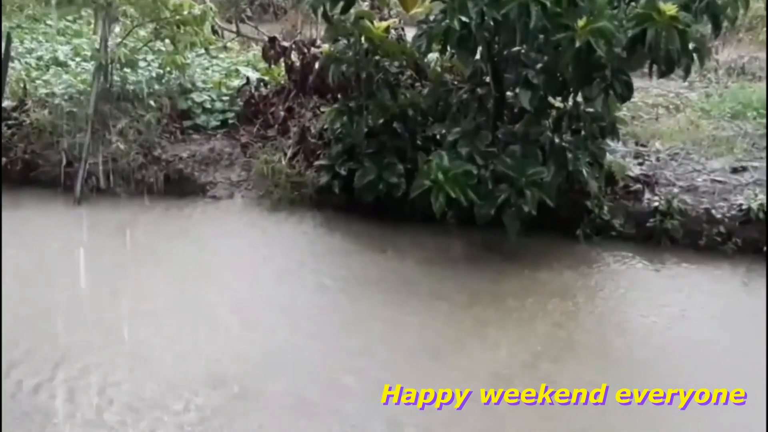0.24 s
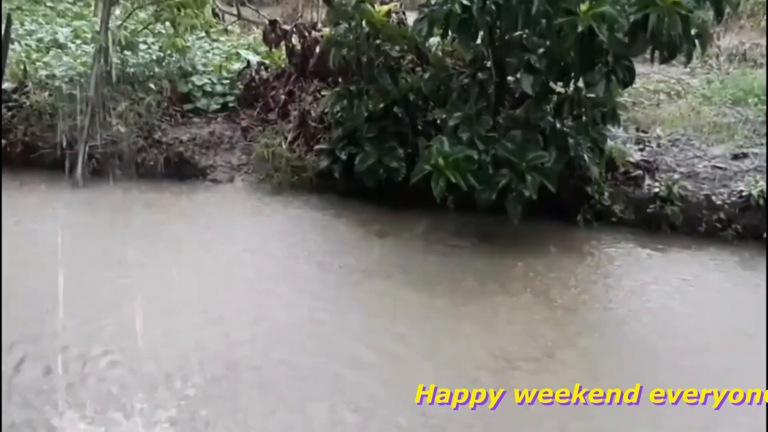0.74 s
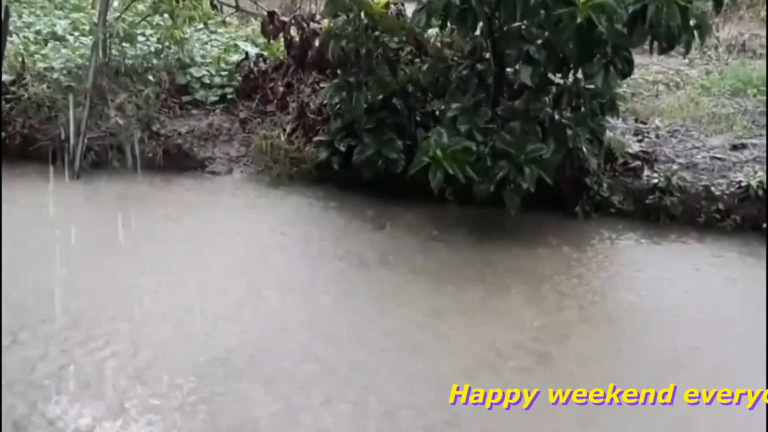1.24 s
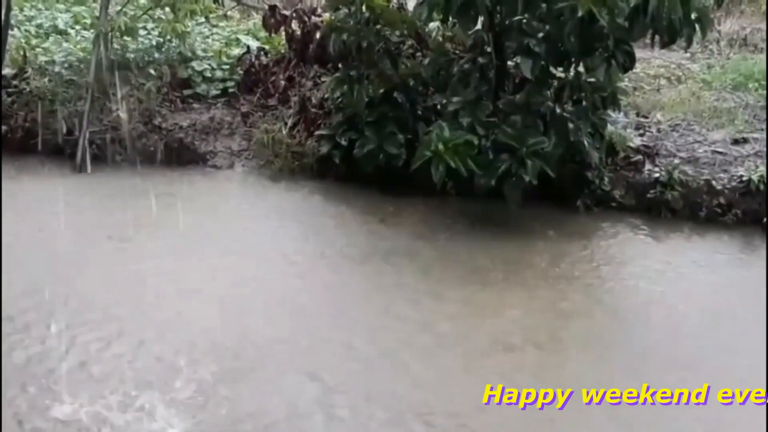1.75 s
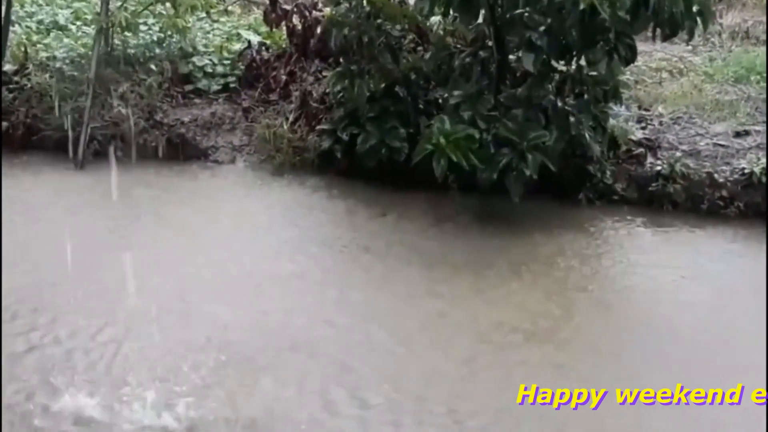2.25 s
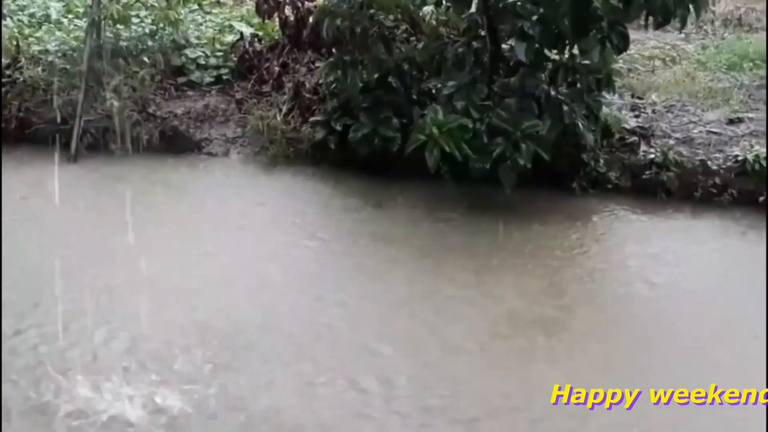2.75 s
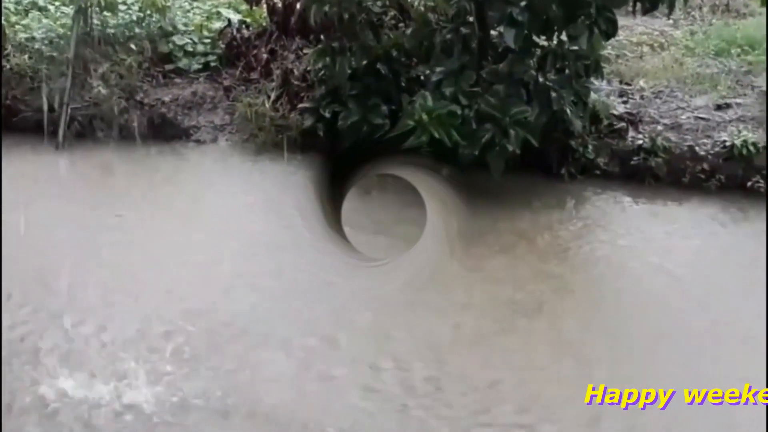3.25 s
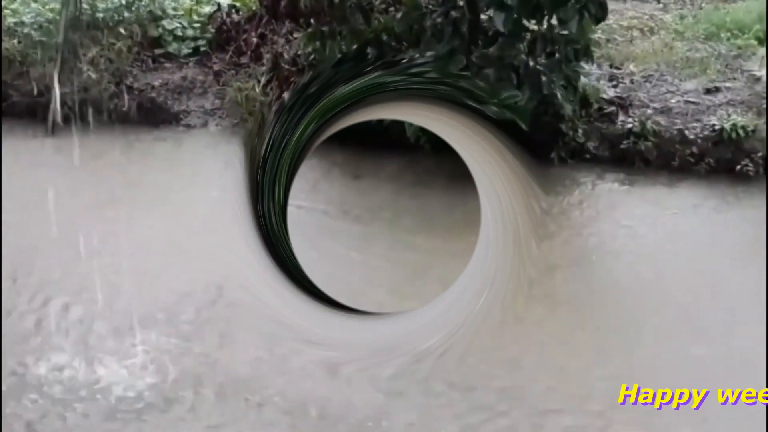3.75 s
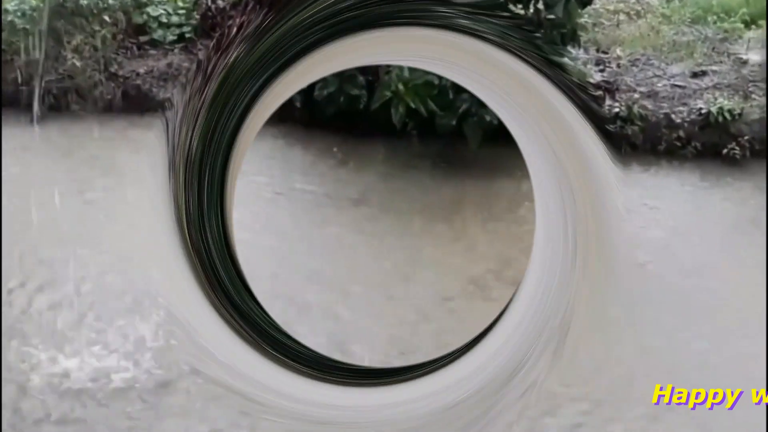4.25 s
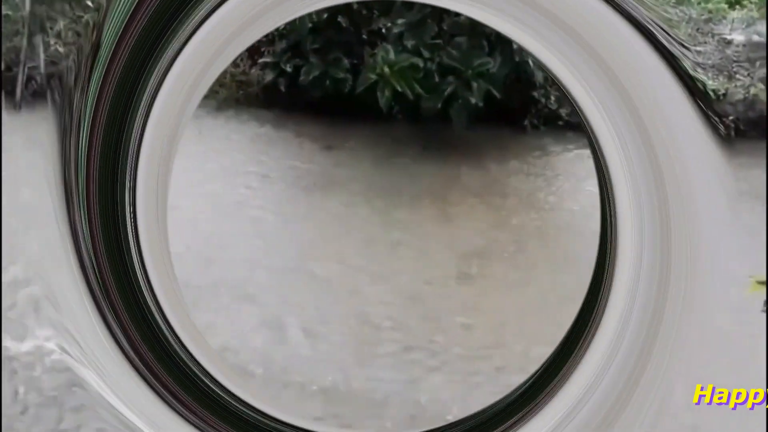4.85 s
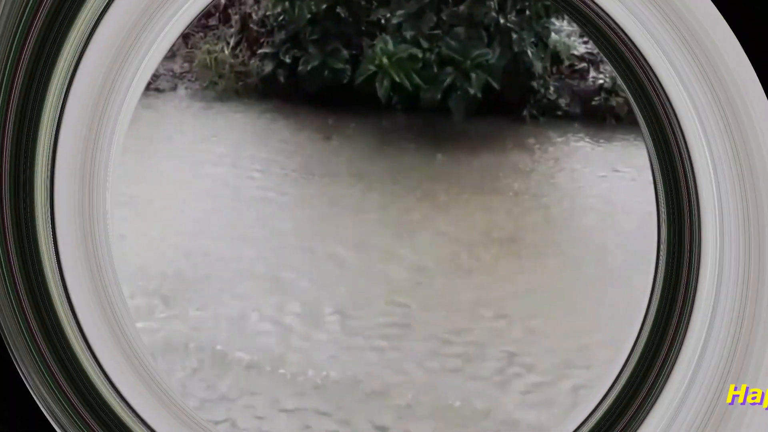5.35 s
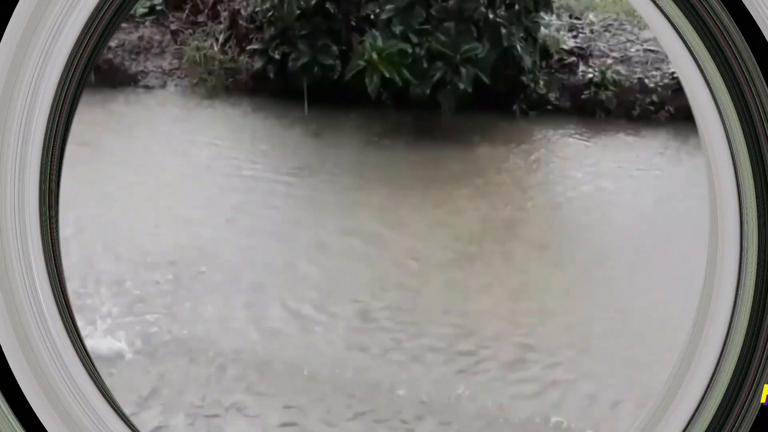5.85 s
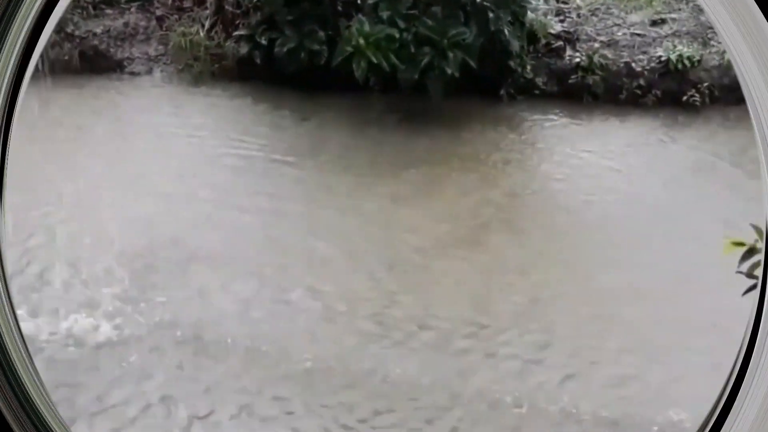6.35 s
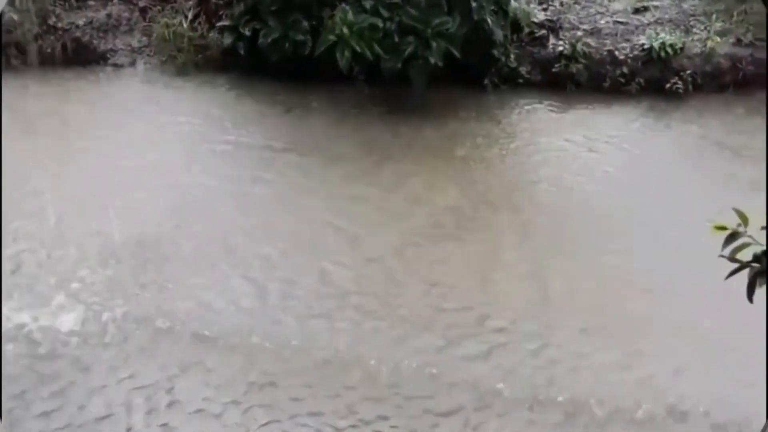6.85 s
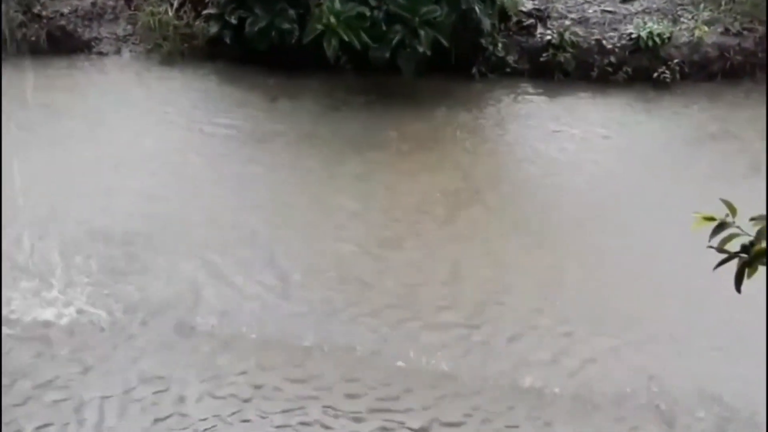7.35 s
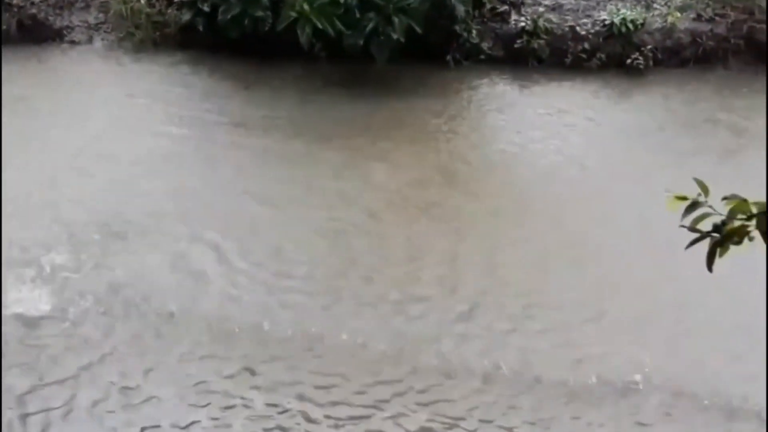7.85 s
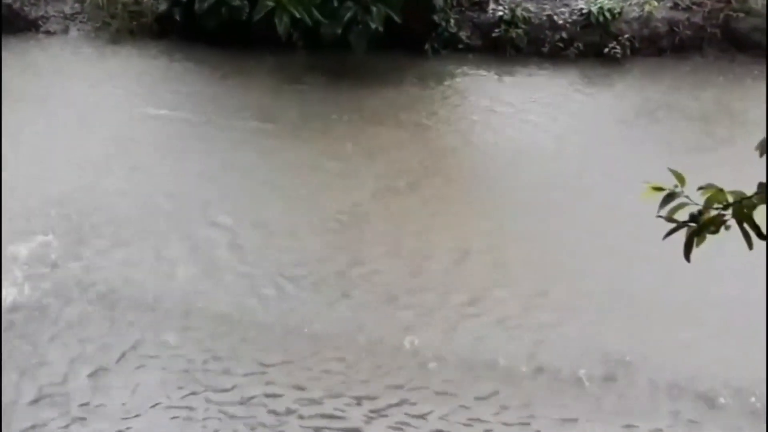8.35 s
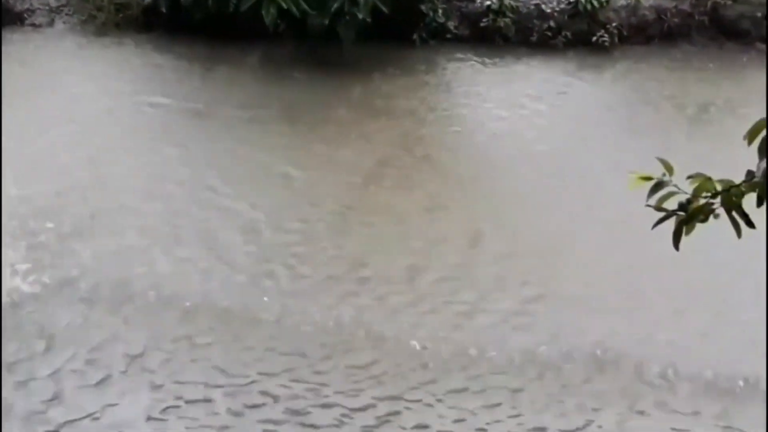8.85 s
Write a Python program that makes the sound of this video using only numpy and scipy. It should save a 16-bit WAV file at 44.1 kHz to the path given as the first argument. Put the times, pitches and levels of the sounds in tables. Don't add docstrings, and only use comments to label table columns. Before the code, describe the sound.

Heavy rain pours without a break onto a garden pond, captured close from the bank in wide stereo. Low gurgling run-off plunges into water, mid-pitched drops patter on leaves, and a bright, grainy fizz covers the surface. The level stays nearly even, fluttering with small gushes several times a second. Near drops crack sharply, often in the first 3 seconds, the strongest at about 1.7, leaning left. Brief bubble tones bloop low around 1.3 and 3.8, with a cluster of higher plinks near 4. A barely audible engine hums far away, dips around 4, returns weakly near 5.3, slows and is almost gone by 9. Between 3 and 8 the hiss turns slightly hollow, with a faint drone, most marked around 5.5, then clears. Near drops thin out mid-way and return from 6.7, and rain continues to the end.

```python
import sys
import numpy as np
from scipy import signal
from scipy.fft import rfft, irfft, next_fast_len
from scipy.io import wavfile
from scipy.ndimage import uniform_filter1d, minimum_filter1d, map_coordinates

SR = 44100
rng = np.random.default_rng(int(sys.argv[2]) if len(sys.argv) > 2 else 0)


def transcribe(signal):
    frames = np.atleast_2d(signal).T
    limited = np.clip(frames, -1, 1)
    pcm = np.round(limited * 32767).astype(np.int16)
    wavfile.write(sys.argv[1], SR, pcm)


def boost_factor(decibels):
    exponent = np.asarray(decibels, float) / 20
    return 10 ** exponent


N = 401751


def unit(x):
    return x / np.sqrt(np.mean(x ** 2) + 1e-20)


def along(points, hz):
    f, v = np.transpose(points)
    return np.interp(np.log(hz + 1), np.log(f + 1), v)


def curves(rows):
    s, *columns = np.transpose(rows)
    return [np.interp(np.arange(N) / SR, s, column) for column in columns]


def wobble(rate):
    knots = rng.standard_normal(int(N * rate / SR) + 4)
    return map_coordinates(knots, [np.arange(N) * rate / SR])


def filtered(x, response):
    m = next_fast_len(N + 8192)
    return irfft(rfft(x, m) * response(np.fft.rfftfreq(m, 1 / SR)), m)[..., :N]


# frequency in Hz, left-right correlation.
PORT_LIKENESS = [(40, 0.82), (250, 0.97), (600, 0.68), (950, 0.37), (1300, -0.45), (1750, -0.31),
                 (2300, 0.34), (2500, 0.24), (2900, -0.38), (3400, -0.1), (6200, -0.043), (7400, 0.21),
                 (9000, 0.024)]


def heard(pair, spectrum):
    def response(hz):
        turn = np.arccos(np.clip(along(PORT_LIKENESS, hz), -1, 1)) / 2
        return boost_factor(along(spectrum, hz)) * np.array([np.cos(turn), np.sin(turn)])
    mid, side = filtered(pair, response)
    return unit(np.array([mid + side, mid - side]))


def rings(s, hz, t60, gain, rise, size):
    t = np.arange(size) / SR
    age = t / t60[:, None]
    tone = np.sin(2 * np.pi * hz[:, None] * t * (1 + rise * age))
    wave = tone * boost_factor(-60 * age) * (1 - np.exp(-12 * age))
    at = np.round(s * SR).astype(int)[:, None] + np.arange(size)
    return np.bincount(at.ravel(), (gain[:, None] * wave).ravel(), N + size)[:N]


def drops(count, low_hz, high_hz, cycles, spread_db, rise, size):
    def shower():
        when, pitch, big = rng.random((count, 3)).T
        hz = low_hz * (high_hz / low_hz) ** pitch
        size_db = np.minimum(-spread_db * np.log(big), 6)
        return rings(when * (N - 1) / SR, hz, cycles / hz, hz * boost_factor(size_db), rise, size)
    return unit(np.array([shower(), shower()]))


def patchy(broad_db, fine_db):
    def patches(bins, frames):
        noise = rng.standard_normal(z.shape[1:])
        return unit(uniform_filter1d(uniform_filter1d(noise, size=bins, axis=0), size=frames, axis=1))
    z = signal.stft(rng.standard_normal((2, N)), nperseg=1024)[2]
    strength_db = broad_db * patches(14, 5) + fine_db * patches(3, 3)
    return unit(signal.istft(z * boost_factor(strength_db), nperseg=1024)[1][:, :N])


# time in seconds, level in dB over the mean.
DOWNPOUR = [(0, 1), (.6, 0.35), (.87, -0.3), (1.3, 0.3), (1.45, -.5), (2.05, -0.5), (2.6, 0.7),
            (3.95, -0.5), (4.15, -0.2), (4.45, -0.4), (4.75, 0.5), (5.5, .5), (5.6, -.5), (6.3, 0.44),
            (7.05, -0.36), (7.6, 0), (8.25, -1), (9.11, -0.1)]


def rain():
    pour_db, = curves(DOWNPOUR)
    deep_db, middle_db, fine_db = gushes()
    surge = wobble(24)
    return plunge(pour_db, deep_db, surge) + patter(pour_db, middle_db, surge) + fizz(pour_db, fine_db, surge)


# time in seconds, swell in dB, length in seconds,
# brightness from -1 (deep plunge) to 1 (fine spray).
GUSHES = [(.13, 0.98, 0.055, 0.091), (.35, 2, 0.045, -0.68), (.57, 1.2, 0.055, 0.3),
          (.76, 0.98, 0.048, 0.051), (1.04, 2.1, 0.086, 0.076), (1.23, 1.1, .08, -0.89),
          (1.71, 0.77, 0.064, -0.052), (1.92, 1.5, 0.063, 0), (2.16, 1.5, 0.055, -0.18),
          (2.71, 0.45, .09, .3), (2.99, 0.6, 0.029, 0.97), (3.15, 0.82, 0.064, 0.044),
          (3.36, 1.2, 0.047, .1), (3.78, 1, 0.11, 0.75), (3.99, 0.77, .07, 0.4), (4.84, 0.95, 0.06, 0),
          (5.23, .9, 0.056, -0.64), (5.45, 1.1, .08, .2), (5.83, 0.78, .07, -0.076), (6.04, 0.5, .07, 0.21),
          (6.29, .9, .08, -0.3), (6.76, 1.1, 0.056, 0.67), (7.26, 0.82, 0.13, -0.26), (7.63, .8, .07, 0.71),
          (7.75, 0.73, .06, -.8), (7.99, 0.9, .08, -0.68), (8.4, 1.2, 0.15, 0.00069), (8.77, 0.65, .08, .2),
          (9.02, 1.5, 0.046, 0.28)]


def gushes():
    t, swell_db = np.arange(N) / SR, np.zeros((3, N))
    for s, db, length, bright in GUSHES:
        span = slice(max(0, round((s - 3 * length) * SR)), round((s + 3 * length) * SR))
        shape = np.exp(-((t[span] - s) / length) ** 2)
        swell_db[:, span] += db * shape * np.array([[1 - bright], [1], [1 + bright]])
    return swell_db


# frequency in Hz, level in dB per Hz.
PLUNGE_COLOUR = [(60, -38), (110, -20.5), (150, -11.5), (280, -1), (360, -1), (430, 3.5), (520, 0),
                 (900, -1), (1200, -16), (2000, -45)]


def plunge(pour_db, gush_db, surge):
    drained_db = 0.05 * (np.arange(N) - N / 2) / SR
    level_db = -20.5 + 1.07 * pour_db + gush_db - drained_db
    plops = drops(count=500, low_hz=200, high_hz=1100, cycles=35, spread_db=3, rise=.1, size=2200)
    gurgle = patchy(broad_db=.6, fine_db=.7) + boost_factor(-19) * plops
    return boost_factor(level_db + 0.13 * surge + 0.09 * wobble(9.7)) * heard(gurgle, PLUNGE_COLOUR)


# frequency in Hz, level in dB per Hz.
PATTER_COLOUR = [(500, -56), (900, -7), (1120, -2), (1260, 1.5), (1850, -0.5), (2100, -2.5), (2800, -6),
                 (3300, -15), (5000, -42)]


def patter(pour_db, gush_db, surge):
    level_db = -15.5 + pour_db + 0.63 * gush_db
    plinks = drops(count=1200, low_hz=900, high_hz=3300, cycles=70, spread_db=3, rise=.05, size=1500)
    leaves = patchy(broad_db=0.78, fine_db=0.26) + boost_factor(-14.5) * plinks
    return boost_factor(level_db + 0.18 * surge + 0.54 * wobble(20)) * heard(leaves, PATTER_COLOUR)


# frequency in Hz, level in dB per Hz.
FIZZ_COLOUR = [(1800, -21.5), (3000, -0.5), (3500, -1), (4200, 0), (5000, -2.5), (6200, -3.5), (7000, -2.5),
               (7500, -1.5), (7800, -4), (8500, -11.5), (9200, -14.5), (10300, -15.5), (10800, -23)]


def fizz(pour_db, gush_db, surge):
    level_db = -18.5 + 1.1 * pour_db + 0.75 * gush_db + np.array([[-.25], [.25]])
    specks = drops(count=2400, low_hz=2800, high_hz=10500, cycles=90, spread_db=3, rise=.03, size=700)
    spray = patchy(broad_db=1.2, fine_db=1.46) + boost_factor(-12) * specks
    return boost_factor(level_db + 0.31 * surge + 0.55 * wobble(30)) * heard(spray, FIZZ_COLOUR)


# time in seconds, peak in dB, pitch in Hz, length in
# seconds.
SOFT_TONES = [(0.056, -22, 2370, .04), (0.42, -19, 2280, 0.04), (0.589, -17, 944, 0.045),
              (0.848, -16, 1780, .04), (1.06, -20, 1840, .03), (1.228, -16, 2404, 0.041),
              (1.238, -15.5, 444, 0.11), (1.353, -15, 427, 0.11), (1.465, -17.5, 418, 0.029),
              (2.626, -25, 2200, 0.056), (2.708, -20, 1360, 0.051), (2.704, -19, 7300, 0.059),
              (2.843, -29, 7500, .08), (3.18, -18, 2270, 0.056), (3.799, -20, 425.5, 0.14),
              (3.932, -14, 2340, 0.038), (3.915, -16, 1930, .04), (3.951, -14.5, 1990, .06),
              (3.985, -16, 2050, .04), (4.016, -16, 1600, 0.046), (4.03, -12.5, 2017, .03),
              (4.147, -17, 2267, 0.036), (5.559, -14, 1608, 0.03), (7.74, -18, 474, 0.082),
              (7.975, -20, 564, 0.076), (8.13, -19, 1690, 0.033), (8.84, -17, 1270, 0.035)]


def soft_tones():
    out, t, drift = np.zeros((2, N)), np.arange(N) / SR, wobble(60)
    for s, db, hz, length in SOFT_TONES:
        span = slice(max(0, round((s - length) * SR)), round((s + length) * SR))
        since = t[span] - s
        age = since / length
        waver = 1.9 * np.roll(drift, round(hz * 10))[span] + rng.uniform(0, 1.35, (2, 1))
        tone = np.sin(2 * np.pi * hz * since * (1 + 0.0071 * age) + waver)
        out[:, span] += boost_factor(db - 3.5 - 31 * age ** 2) * tone
    return out


# start in seconds, peak in dB, left-right difference in dB.
NEAR_DROPS = [(0.1121, -8, -0.5), (0.3321, -10, 0.0), (0.4943, -8, 0.0), (0.5496, -7, -0.5),
              (0.6764, -7, -1.0), (1.0146, -9, -1.0), (1.2151, -9, -1.0), (1.6945, -11, -0.5),
              (1.7195, 2, 3), (2.1485, -7, -1.0), (2.3077, -9, 0.5), (2.4864, -8, -1.0),
              (2.6668, -10, -0.5), (2.9756, -9, -1.0), (2.9961, -6, 0.0), (4.6493, -11, -1.0),
              (5.8722, -11, 0.0), (6.0626, -12, -1.5), (6.6692, -6, -1.5), (6.758, -6, -1),
              (6.776, -6, -0.5), (7.3985, -6, -1.0), (7.7712, -11, -1.0), (8.1514, -9, -1.0),
              (8.2955, -10, -0.5), (8.4871, -10, -0.5), (8.5599, -10, -0.5), (8.8453, -11, -0.5),
              (8.9979, -9, -0.5), (9.0623, -6, -0.5)]


def splats():
    out, t = np.zeros((2, N + SR)), np.arange(900) / SR
    for s, db, pan_db in NEAR_DROPS:
        crack = boost_factor(db - 5.5 - 60 * t / 0.025) * rng.standard_normal((2, len(t)))
        out[:, round(s * SR):][:, :len(t)] += crack * boost_factor([[pan_db / 2], [-pan_db / 2]])
    return filtered(out[:, :N], lambda hz: boost_factor(along(FIZZ_COLOUR, hz)))


# time in seconds, firing rate in Hz, level in dB.
ENGINE_RUN = [
    (0, 22.5, -41),
    (2, 22.1, -41.5),
    (2.9, 21.9, -42.5),
    (3.8, 22.2, -47),
    (5.3, 21.5, -41.5),
    (6.3, 21.3, -42.5),
    (7.8, 20.6, -50),
    (9.11, 20.3, -58),
]
# multiple of the firing rate, level in dB.
ENGINE_ORDERS = [(4, -15), (5, -3), (6, 0), (8, -14)]
# frequency in Hz, level in dB per Hz.
RUMBLE_COLOUR = [(20, -18), (70, -18), (110, 5.5), (160, -3), (260, -19)]


def engine():
    hz, tone_db = curves(ENGINE_RUN)
    load_off_s, ramp_s = 3.9, .3
    idle = np.clip((np.arange(N) / SR - load_off_s) / ramp_s + .5, 0, 1)
    load_db = -16 * idle
    rumble_db = -41.5 - 10 * idle
    turn = 2 * np.pi * np.cumsum(hz) / SR
    tones = np.zeros(N)
    for k, db in ENGINE_ORDERS:
        level_db = tone_db + db + (k < 6) * load_db + 1.5 * wobble(4)
        tones += boost_factor(level_db) * np.sin(k * turn + .3 * wobble(6))
    return tones + boost_factor(rumble_db) * heard(rng.standard_normal((2, N)), RUMBLE_COLOUR)


def scene():
    return rain() + soft_tones() + splats() + engine()


def limiter(x):
    need = np.minimum(1, .97 / (np.abs(x).max(axis=0) + 1e-9))
    return x * uniform_filter1d(minimum_filter1d(need, size=129), size=65)


def ragged_band_limit(x):
    hz, t, z = signal.stft(x, SR, nperseg=2048)
    dips = np.repeat(rng.exponential(size=len(t)), 2)[:len(t)]
    edge_hz = 10920 - 140 * dips
    return signal.istft(z * (hz[:, None] < edge_hz), SR, nperseg=2048)[1][:, :N]


def dissolve(x):
    start_s, end_s, late = 3.0, 8.0, 318
    share = np.clip((np.arange(N) / SR - start_s) / (end_s - start_s), 0, 1)
    return (1 - share) * x + share * np.pad(x, ((0, 0), (late, 0)))[:, :N]


# time in seconds, peak in dB.
HIGH_TICKS = [(0.0408, -58), (0.3321, -53), (0.609, -46), (0.7163, -50), (0.7816, -41), (1.1503, -50),
              (1.3613, -54), (2.6828, -54), (3.3792, -48), (3.7738, -55), (4.0292, -62), (5.5433, -47),
              (6.3081, -58), (7.7164, -45)]


def high_ticks():
    ticks = np.zeros((2, N))
    for s, db in HIGH_TICKS:
        burst = np.hanning(1100) ** 2 * rng.standard_normal(1100)
        ticks[:, round(s * SR) - 300:][:, :1100] = boost_factor(db + 1) * burst
    spill = filtered(ticks, lambda hz: np.exp(-((hz - 14750) / 1100) ** 6))
    return boost_factor([[1], [-1]]) * spill


def low_pass(x):
    return signal.sosfilt(signal.butter(12, 15830, fs=SR, output="sos"), x)


def record(dry):
    x = ragged_band_limit(limiter(dry))
    mix = dissolve(x) + high_ticks()
    return low_pass(mix)


dry = scene()
out = record(dry)
transcribe(out)
```